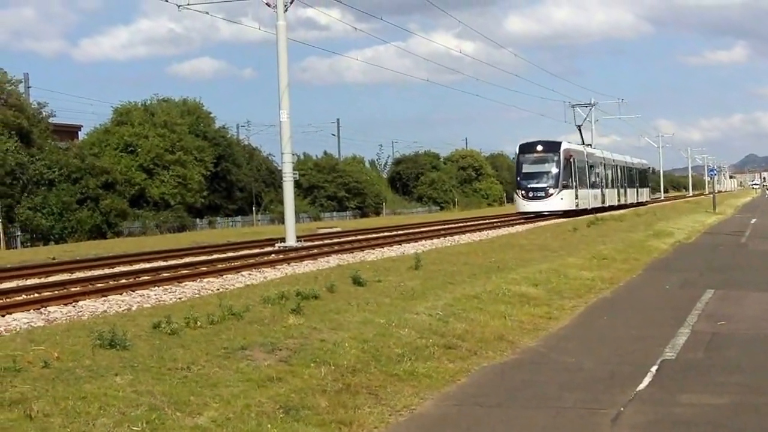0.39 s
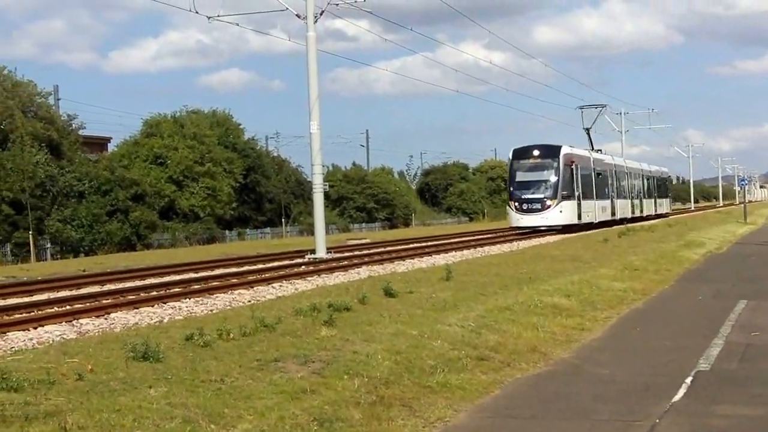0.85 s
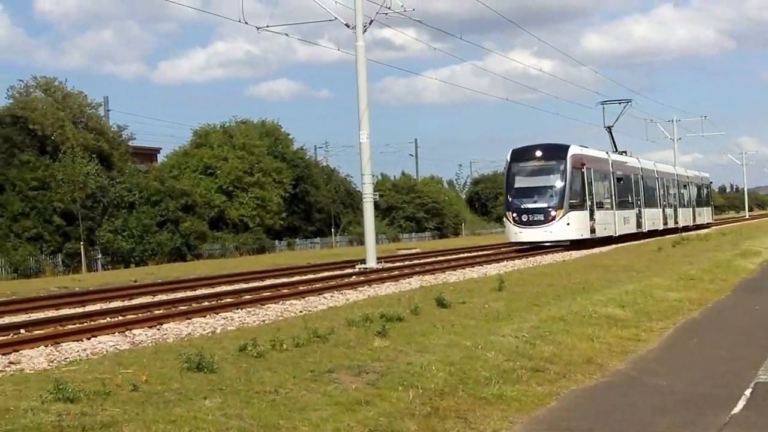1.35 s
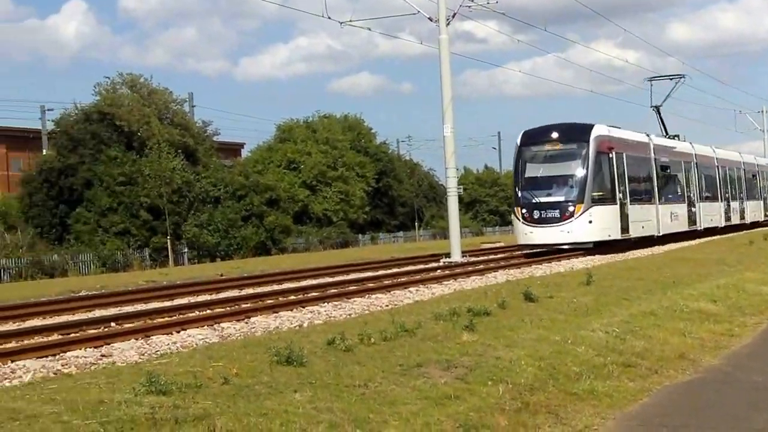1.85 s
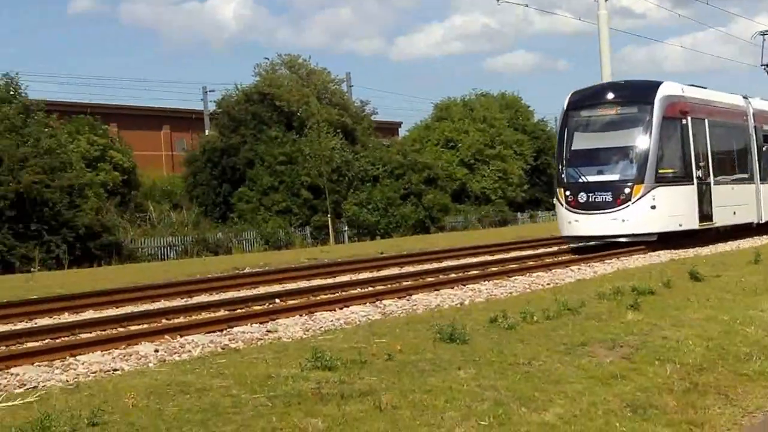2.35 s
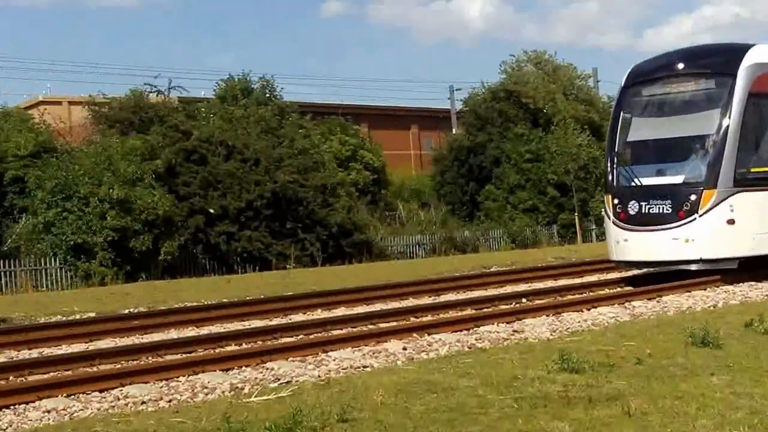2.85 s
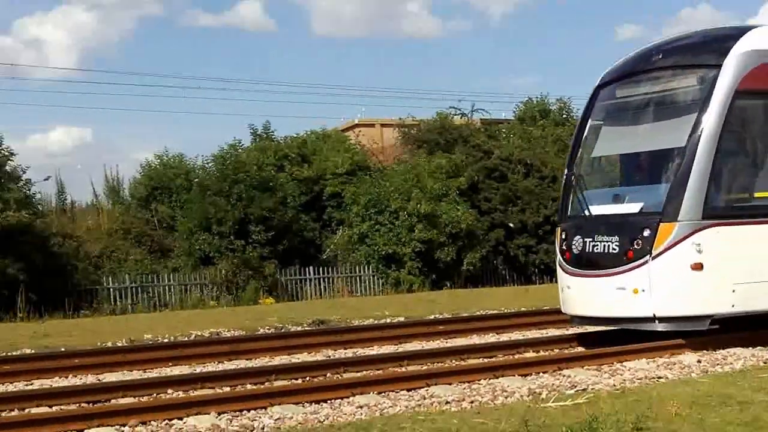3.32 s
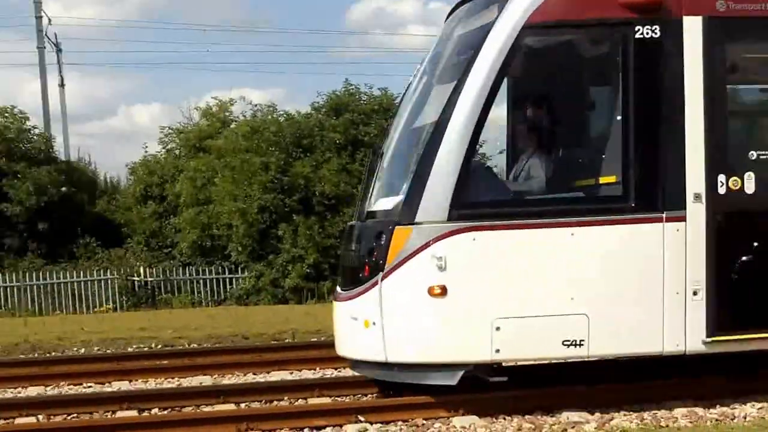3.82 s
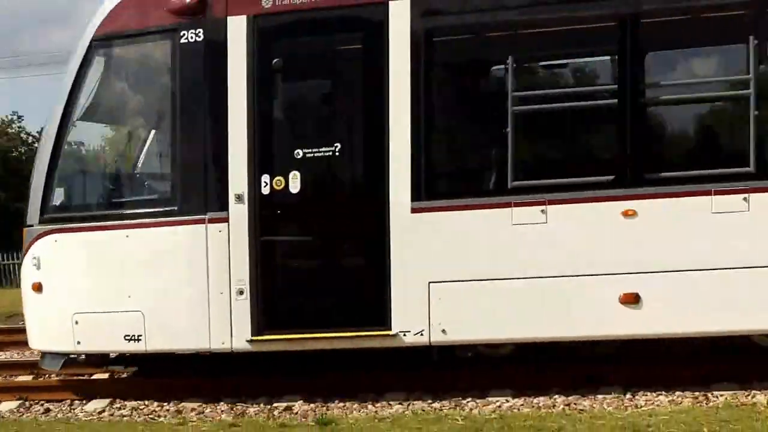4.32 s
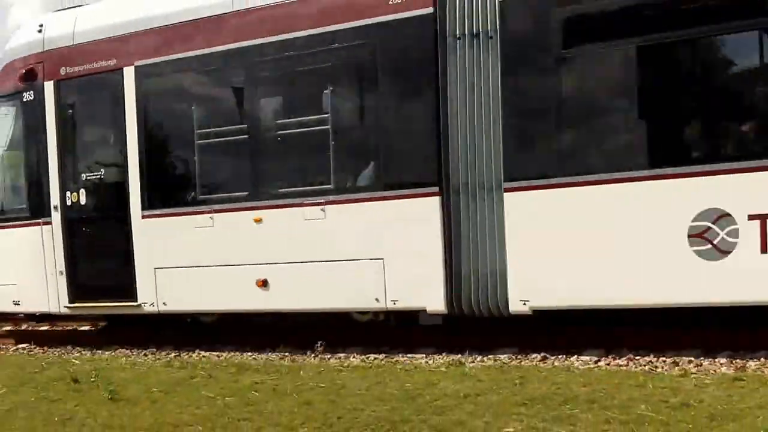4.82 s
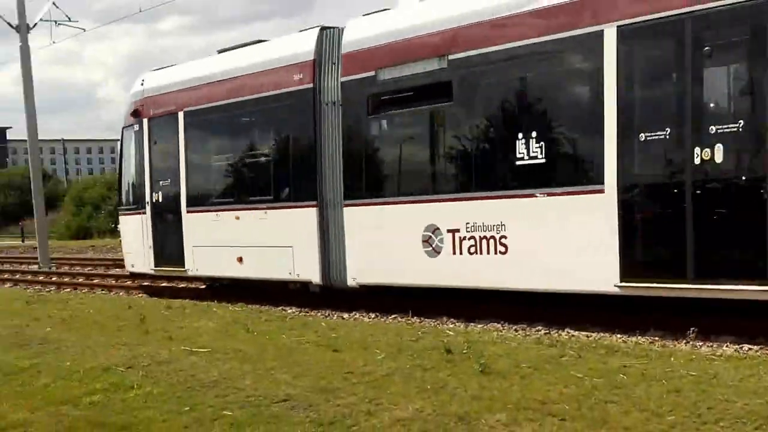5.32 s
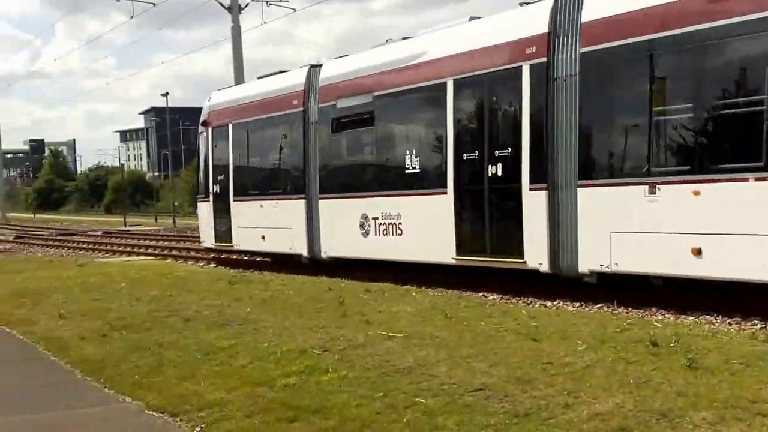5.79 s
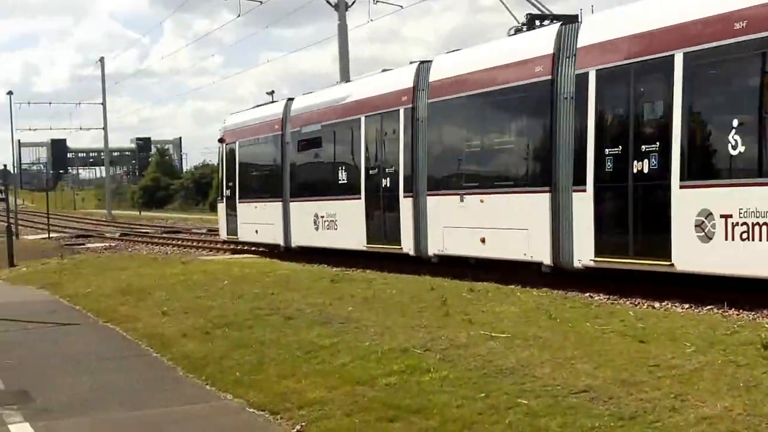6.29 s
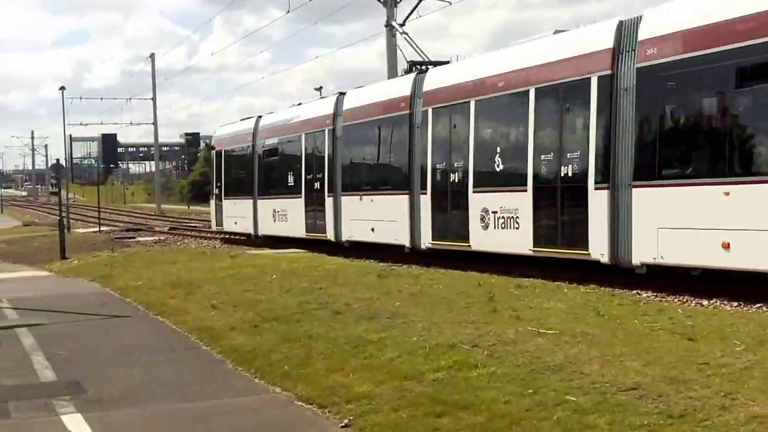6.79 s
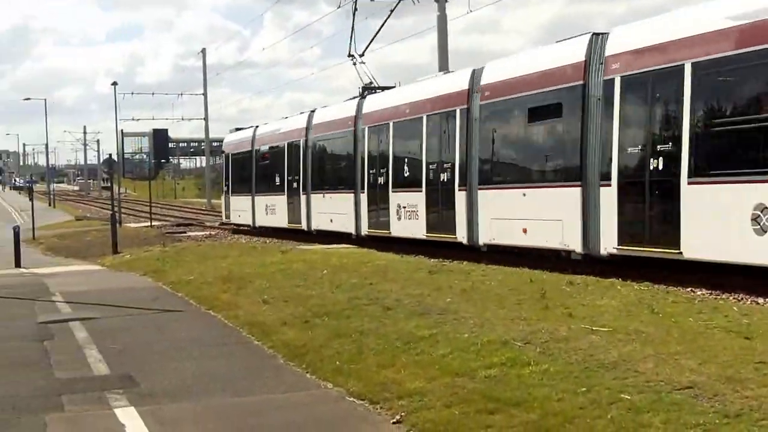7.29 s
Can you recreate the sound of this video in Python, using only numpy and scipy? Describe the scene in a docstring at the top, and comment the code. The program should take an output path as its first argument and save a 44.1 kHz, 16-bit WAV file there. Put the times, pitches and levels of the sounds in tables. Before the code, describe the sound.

A slowing electric tram approaches from far off: quiet metallic hiss first, then swelling roar and ringing steel, small clicks from rail joints and a faint falling motor whine. The loud pass lasts a couple of seconds, pulsing as wheel sets go by, with soft air puffs nearly buried. Gears sing downward as it starts leaving. Near-mono camera sound with light hiss, open roadside.

```python
"""An electric tram rolls in from afar, slowing: motors hum, rail and wheels ring as resonant bands of noise.
Rail joints tick, motor slots whine, and the rolling noise, four coloured bands, swells to a close pass at 4.3-6.1 s.
Single steel modes sing out from 3.3 s, gears from 5.1 s, motor and gear tones sinking with the speed; two soft
brake puffs fall near 6 s. Then the wheels recede with a narrow hiss near 7.2 s.
Throughout: a wash of far traffic, and the camera's own shaped hiss and steady thin whistles."""
import sys
import numpy as np
from scipy import signal
from scipy.io import wavfile
from scipy.ndimage import uniform_filter1d, map_coordinates

SR = 44100
rng = np.random.default_rng(int(sys.argv[2]) if len(sys.argv) > 2 else 0)


def store_wav(level_fs):
    """Save 16-bit WAV to argv[1]."""
    pcm = np.round(np.clip(np.atleast_2d(level_fs), -1, 1) * 32767)
    wavfile.write(sys.argv[1], SR, pcm.T.astype(np.int16))


def natural_amplitude(level_db):
    """Convert a level in decibels to a linear amplitude factor, elementwise."""
    exponent = np.asarray(level_db, float) / 20
    return 10 ** exponent


N = 337806


def spectrum(points, hz):
    """Amplitude gain from (hz, db) points joined on a log-frequency axis, -120 dB outside."""
    point_hz, point_db = np.transpose(points)
    return natural_amplitude(np.interp(np.log(hz + 1), np.log(point_hz + 1), point_db, -120, -120))


def curves(rows, t):
    """Each column after the time, interpolated at times t."""
    time_s, *columns = np.transpose(rows)
    return [np.interp(t, time_s, column) for column in columns]


def swells(rows, length_s, t):
    """Bell-shaped lifts in dB, one sum for each column after the time."""
    time_s, *columns = np.transpose(rows)
    bells = np.exp(-((t[:, None] - time_s) / length_s) ** 2)
    return [bells @ column for column in columns]


def bell(t, centre_s, length_s):
    """Gaussian envelope, 1/e at length_s either side."""
    return np.exp(-((t - centre_s) / length_s) ** 2)


def wobble(knots_per_s):
    """A smooth random curve through normally distributed knots."""
    knots = rng.standard_normal(int(N * knots_per_s / SR) + 4)
    return map_coordinates(knots, [np.arange(N) * knots_per_s / SR])


def peak(hz, centre_hz, width_hz):
    """Gain of a steep resonance, one half at width_hz / 2 off centre."""
    return 1 / (1 + (2 * (hz - centre_hz) / width_hz) ** 2)


def rush(shape, patchy_db):
    """Noise coloured by shape(hz, t), scaled to rms 1 in each frame, then given patches of random gain."""
    hz, t, bins = signal.stft(rng.standard_normal(N), SR, nperseg=2048)
    gain = shape(hz[:, None], t) * np.ones(bins.shape)
    gain /= np.sqrt(np.mean(gain ** 2, 0))
    field = uniform_filter1d(rng.standard_normal(bins.shape), size=12, axis=0)
    field = uniform_filter1d(field, size=4, axis=1)
    patches = natural_amplitude(patchy_db * field / field.std())
    return signal.istft(bins * gain * patches, SR, nperseg=2048)[1][:N]


def colored(points, patchy_db):
    """Noise of a fixed spectrum."""
    return rush(lambda hz, s: spectrum(points, hz), patchy_db)


def band(centre_hz, width_hz, patchy_db):
    """Noise through one fixed resonance."""
    return rush(lambda hz, s: peak(hz, centre_hz, width_hz), patchy_db)


def tone(hz, db, drift_hz, flutter_db):
    """A sine of rms level db that wanders a little in pitch and level."""
    phase = 2 * np.pi * (np.cumsum(hz + drift_hz * wobble(12)) / SR + rng.random())
    return np.sqrt(2) * natural_amplitude(db + flutter_db * wobble(5.4)) * np.sin(phase)


def heard(rows, t):
    """Fades a source in and out over 0.12 s at the ends of its table."""
    since_s = t - rows[0][0] + 0.046
    left_s = rows[-1][0] + 0.079 - t
    return np.clip(np.minimum(since_s, left_s) / 0.12, 0, 1)


# nearness of the wheels, 0 = loudest moment: time_s, nearness_db
NEARNESS = [(0, -28), (.7, -25), (1.4, -20), (2.1, -16), (2.7, -12), (3.1, -8.5), (3.7, -3.5), (4.3, 0),
            (5.0, -1), (5.7, -.5), (6.1, 0), (6.7, -2), (7.2, -3), (7.66, -7)]


def level(t, nearest_db, db_per_db, sag_db_per_s):
    """Level in dB that follows nearness, with a steady sag once the tram is alongside."""
    alongside_s = 4.86
    nearness_db = curves(NEARNESS, t)[0]
    return nearest_db + db_per_db * nearness_db - sag_db_per_s * np.maximum(t - alongside_s, 0)


# bogies rolling past lift wheels and rumble: time_s, wheel_lift_db, rumble_lift_db
BOGIE_LIFTS = [(2.5, 0.5, 2), (3.6, 0.5, 0), (4.5, 3, 1.5), (5.3, 2.5, 0.5), (6.15, 3.5, 2), (6.9, 1.5, 3)]
BOGIE_LENGTH_S = 0.29
# low rolling noise, spectral density: freq_hz, density_db
RUMBLE_SPECTRUM = [(24, -54), (40, -27), (75, -23), (107, -15), (156, -14), (285, -4), (346, -1.5),
                   (433, -6), (520, -8.5), (680, 0), (1140, -120)]
# mid rolling noise: freq_hz, density_db
ROAR_SPECTRUM = [(300, -54), (500, -2.5), (900, 1.5), (1400, -0.5), (1750, -4.5), (2300, -3), (3200, -17),
                 (4500, -19.5)]
# upper rolling noise: freq_hz, density_db
HISS_SPECTRUM = [(1650, -16.5), (2800, -2.5), (3180, -3.5), (3660, -2.5), (4750, -8.5), (5440, -9.5),
                 (6120, -13.5), (7020, -11.5), (9000, -24), (11700, -32), (19800, -120)]
# treble rolling noise: freq_hz, density_db
FIZZ_SPECTRUM = [(4710, -16), (8000, 0), (10800, -8.5), (11600, -10), (13500, -18), (15000, -23)]
# narrow hisses that swell with the fizz: centre_hz, width_hz, level_re_fizz_db
FIZZ_BANDS = [(11470, 120, -20)]


def rolling(t):
    """Surface roughness shakes ground, body and air: four broad layers."""
    rumble_db = level(t, nearest_db=-40.5, db_per_db=0.86, sag_db_per_s=-0.12)
    rumble_db = rumble_db + swells(BOGIE_LIFTS, BOGIE_LENGTH_S, t)[1]
    roar_db = level(t, nearest_db=-30.5, db_per_db=0.73, sag_db_per_s=0.65) + 0.7 * wobble(3.13)
    hiss_db = level(t, nearest_db=-35, db_per_db=1.074, sag_db_per_s=0.38) + 0.6 * wobble(4.5)
    fizz_db = level(t, nearest_db=-48, db_per_db=0.69, sag_db_per_s=0.9)
    rumble = natural_amplitude(rumble_db) * colored(RUMBLE_SPECTRUM, patchy_db=0.9)
    roar = natural_amplitude(roar_db) * colored(ROAR_SPECTRUM, patchy_db=1.16)
    hiss = natural_amplitude(hiss_db) * colored(HISS_SPECTRUM, patchy_db=1.12)
    fizz = colored(FIZZ_SPECTRUM, patchy_db=1.6)
    for centre_hz, width_hz, db in FIZZ_BANDS:
        fizz = fizz + natural_amplitude(db) * band(centre_hz, width_hz, patchy_db=4.5)
    return rumble + roar + hiss + natural_amplitude(fizz_db) * fizz


# rail resonance, sinking as the tram draws level: time_s, pitch_hz
RAIL_PITCH = [(0, 787), (2.5, 766), (4.4, 732), (7.66, 726)]
# swells of the rail's ringing: time_s, lift_db
RAIL_LIFTS = [(.75, 4), (1.55, 2), (2.4, 3.5), (3.1, 5), (3.5, 3.5), (4.16, 0), (4.8, 2), (5.75, 3.5),
              (6.57, 2.5), (7.22, 3)]


def rail(t):
    """Roughness rings the rail: one gliding resonance of noise."""
    ringing = rush(lambda hz, s: peak(hz, curves(RAIL_PITCH, s)[0], width_hz=160), patchy_db=1.0)
    rail_db = level(t, nearest_db=-34.5, db_per_db=0.61, sag_db_per_s=-0.2)
    return natural_amplitude(rail_db + swells(RAIL_LIFTS, 0.12, t)[0]) * ringing


# reference pitch of the wheel modes: time_s, pitch_hz
WHEEL_PITCH = [(0, 1940), (1.5, 1946), (3.3, 2070), (4.8, 2027), (5.1, 2070), (5.7, 2080), (6.0, 1984),
               (7.66, 1980)]
# wheel resonances: ratio_to_wheel_pitch, width_hz, relative_level_db
WHEEL_RESONANCES = [(1.001, 176, 2), (1.07, 200, -4.5), (0.682, 91, -8.5), (1.202, 221, -3),
                    (1.388, 107, -6), (1.72, 362, -16), (2.2, 200, -21.5)]


def wheels(t):
    """The same roughness rings the wheels; all modes slide together, in uneven bursts."""
    def modes(hz, s):
        pitch_hz = curves(WHEEL_PITCH, s)[0]
        power = sum((natural_amplitude(db) * peak(hz, ratio * pitch_hz, width_hz)) ** 2
                    for ratio, width_hz, db in WHEEL_RESONANCES)
        return np.sqrt(power)

    bursts = natural_amplitude(1.2 * wobble(14)) * rush(modes, patchy_db=1.5)
    wheel_db = level(t, nearest_db=-32, db_per_db=1.12, sag_db_per_s=-0.1)
    return natural_amplitude(wheel_db + swells(BOGIE_LIFTS, BOGIE_LENGTH_S, t)[0]) * bursts


# single steel modes as a bogie passes: centre_s, length_s, pitch_hz, level_db
STEEL_SURGES = [(3.3, .1, 2048, -41), (3.47, .1, 2140, -38), (3.75, .12, 2060, -40), (4.23, .16, 738, -31),
                (4.4, .15, 530, -45), (4.97, .1, 722, -32), (5.22, .08, 2075, -33), (5.15, .2, 11956, -69),
                (5.6, .1, 1985, -38), (6, .25, 356, -47), (6.2, .08, 1915, -37), (6.8, .25, 345, -46),
                (6.9, .2, 11956, -68)]


def surges(t):
    """Single steel modes swell and fade as wavering tones."""
    return sum(bell(t, centre_s, length_s) * tone(hz, db, drift_hz=8, flutter_db=3)
               for centre_s, length_s, hz, db in STEEL_SURGES)


# motor hum, leading bogie: time_s, order_1_hz, order_2_db, order_1_db
FRONT_HUM = [(0, 83.8, -74, -79), (1.5, 76.5, -70, -77), (3, 69.2, -68, -73), (3.7, 65.4, -61, -70),
             (4.2, 62.5, -62, -69), (5.2, 56.6, -54, -67), (5.55, 54.5, -57, -68), (5.9, 52.5, -56, -72)]
# motor hum, trailing bogie: time_s, order_1_hz, order_8_db, order_1_db, order_2_db
REAR_HUM = [(6.75, 60.6, -55, -75, -68), (7.0, 60.1, -54, -72, -62), (7.66, 58.9, -52, -72, -65)]
# motor slot whine, one table per bogie, leading first: time_s, pitch_hz, level_db
SLOT_WHINE = [
    [(2.2, 6441, -66), (2.35, 6397, -64), (2.55, 6338, -71), (2.75, 6280, -63), (3.1, 6176, -63),
     (3.3, 6118, -53), (3.7, 6000, -58), (3.9, 5925, -65), (4.2, 5780, -61), (4.45, 5665, -69),
     (5.05, 5435, -61), (5.5, 5330, -69)],
    [(4.8, 5800, -67), (6, 5580, -65), (6.9, 5290, -66), (7.2, 5175, -62), (7.45, 5100, -62),
     (7.55, 5070, -56), (7.66, 5045, -57)],
]


def motors(t):
    """Motors of two bogies: low orders of their rotation and slot whine."""
    out = np.zeros(N)
    for rows, orders in ((FRONT_HUM, (2, 1)), (REAR_HUM, (8, 1, 2))):
        hz, *levels = curves(rows, t)
        hum = sum(tone(order * hz, db, drift_hz=0.6, flutter_db=1.5) for order, db in zip(orders, levels))
        out += heard(rows, t) * hum
    for rows in SLOT_WHINE:
        out += heard(rows, t) * tone(*curves(rows, t), drift_hz=4, flutter_db=2.5)
    return out


# gear mesh: time_s, pitch_hz, level_db
GEAR_MESH = [(5.2, 2160, -51), (5.55, 2135, -40), (5.8, 2105, -40), (6.0, 2078, -46), (6.3, 2030, -42),
             (6.6, 1980, -37), (6.9, 1947, -38), (7.15, 1926, -39), (7.35, 1911, -45), (7.66, 1890, -46)]
# mesh and its shaft sidebands: offset_hz, relative_level_db
MESH_SIDEBANDS = [(0, 0), (-37, -3), (-75, -5), (-130, -7)]
# second gear stage: time_s, pitch_hz, level_db
SECOND_STAGE = [(5.1, 2860, -54), (5.9, 2780, -52), (6.7, 2705, -50), (7.66, 2635, -52)]


def gears(t):
    """Meshing teeth sing at two stages, the first with shaft sidebands."""
    second = tone(*curves(SECOND_STAGE, t), drift_hz=8.05, flutter_db=3.5)
    hz, db = curves(GEAR_MESH, t)
    mesh = sum(tone(hz + offset_hz, db + rel_db, drift_hz=6, flutter_db=3)
               for offset_hz, rel_db in MESH_SIDEBANDS)
    return heard(SECOND_STAGE, t) * second + heard(GEAR_MESH, t) * mesh


# ticks at rail joints: start_s, onset_level_db
JOINT_TICKS = [(1.5985, -34), (2.619, -42), (2.944, -38), (3.060, -38), (4.483, -31), (4.671, -32)]


def ticks(t):
    """Rail joints: short dull noise bursts, abrupt onset, exponential decay."""
    t60_s = 0.012
    size = sum(natural_amplitude(db - 60 * np.maximum(t - start_s, 0) / t60_s) * (t >= start_s)
               for start_s, db in JOINT_TICKS)
    return size * band(2800, width_hz=3500, patchy_db=0)


# air from the brakes: centre_s, length_s, level_db
BRAKE_PUFFS = [(5.95, .03, -50), (6.27, .03, -54)]


def puffs(t):
    """Escaping brake air: soft bright bells of noise."""
    blow = sum(natural_amplitude(db) * bell(t, centre_s, length_s) for centre_s, length_s, db in BRAKE_PUFFS)
    return blow * band(8000, width_hz=9000, patchy_db=0)


def receding(t):
    """Receding wheels: a bell of narrow-band hiss."""
    return natural_amplitude(-44) * bell(t, centre_s=7.2, length_s=0.35) * band(3420, width_hz=200, patchy_db=2.5)


# far traffic: freq_hz, density_db
TRAFFIC_SPECTRUM = [(24, -75), (40, -47), (87, -18.5), (170, -16), (193, -17), (319, -11.5), (339, -17),
                    (446, -28), (989, -3), (1100, -6.5), (1410, -2.5), (1640, -12.5), (6000, -33.5),
                    (7800, -65), (13200, -120)]


def town():
    """Far traffic: a smooth, steady wash of noise."""
    return natural_amplitude(-45.5) * colored(TRAFFIC_SPECTRUM, patchy_db=1.35)


# camera hiss: freq_hz, density_db
PREAMP_SPECTRUM = [(4000, -35), (5500, -7), (7000, 11), (8000, -19), (9500, -13), (12000, -15), (15200, 2)]
# narrow bands in the camera's hiss: centre_hz, width_hz, level_db
HISS_BANDS = [(6940, 150, -75), (8460, 70, -80), (11530, 80, -87)]
# the camera's highest whistle: pitch_hz, level_db
HIGH_WHISTLE = [(14955, -89), (14985, -83), (15015, -89)]


def camera():
    """Preamp hiss with narrow bands, and thin electronic whistles."""
    hiss = natural_amplitude(-69.5) * colored(PREAMP_SPECTRUM, patchy_db=0)
    for centre_hz, width_hz, db in HISS_BANDS:
        hiss += natural_amplitude(db) * band(centre_hz, width_hz, patchy_db=-1.0)
    # sign flips twice in every picture frame
    frames_per_s = 30.01
    flips = signal.square(2 * np.pi * frames_per_s * (np.arange(N) / SR - 0.004))
    sensor = flips * tone(7867.1, -59.7, drift_hz=0.3, flutter_db=0.4)
    high = sum(tone(hz, db, drift_hz=1.5, flutter_db=1) for hz, db in HIGH_WHISTLE)
    return hiss + sensor + high


def scene():
    """Tram and far traffic as one microphone hears them, copied to two channels."""
    t = np.arange(N) / SR
    tram = rolling(t) + rail(t) + wheels(t) + surges(t) + motors(t) + gears(t)
    tram = tram + ticks(t) + puffs(t) + receding(t)
    return np.tile(tram + town(), (2, 1))


def low_pass(x):
    """Removes everything above the highest recorded frequency."""
    return signal.sosfilt(signal.butter(12, 15200, fs=SR, output="sos"), x)


def record(dry):
    """A 45 Hz bass cut, the camera's shared noise and a faint hiss of each channel's own."""
    bass_cut = signal.butter(2, 45, "high", fs=SR, output="sos")
    hiss_cut = signal.butter(2, 2500, "high", fs=SR, output="sos")
    own_hiss = signal.sosfilt(hiss_cut, natural_amplitude(-74.5) * rng.standard_normal((2, N)))
    mix = signal.sosfilt(bass_cut, dry) + camera() + own_hiss
    return low_pass(mix)


dry = scene()
out = record(dry)
store_wav(out)
```